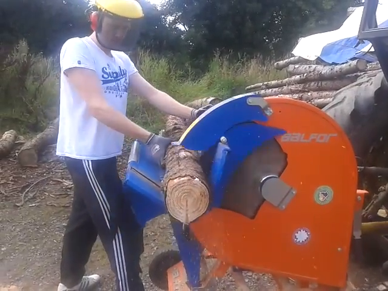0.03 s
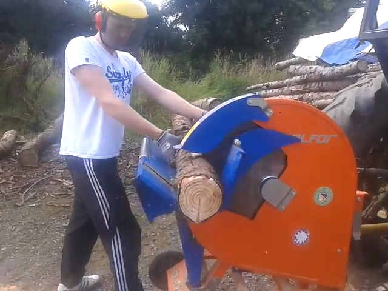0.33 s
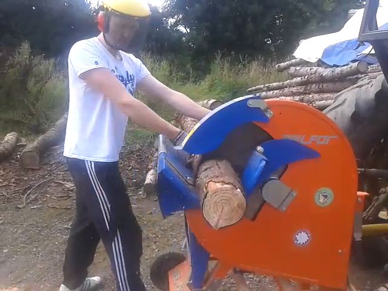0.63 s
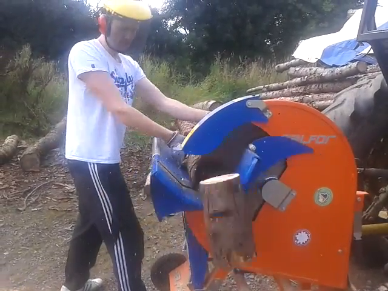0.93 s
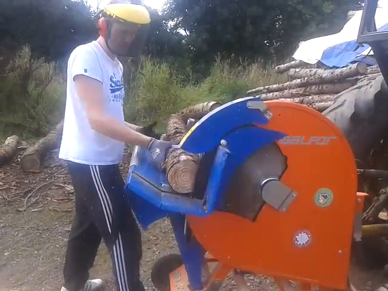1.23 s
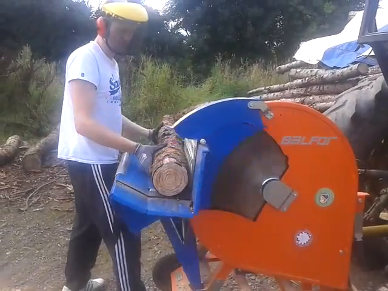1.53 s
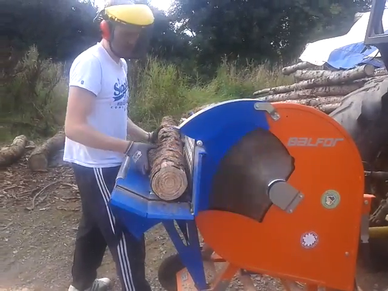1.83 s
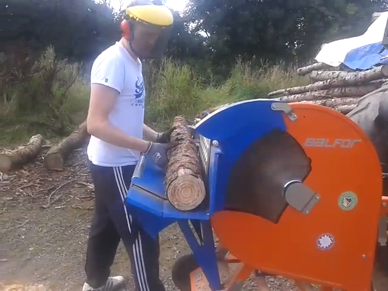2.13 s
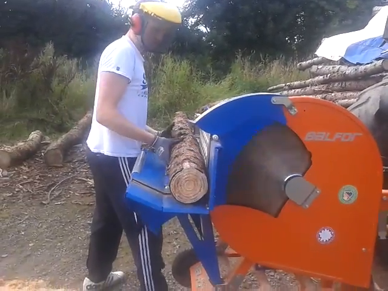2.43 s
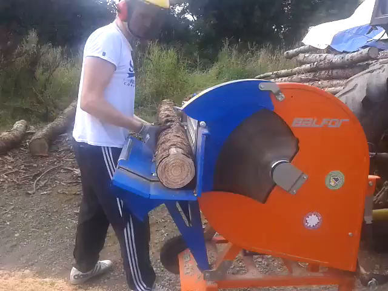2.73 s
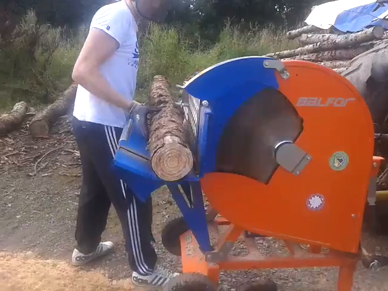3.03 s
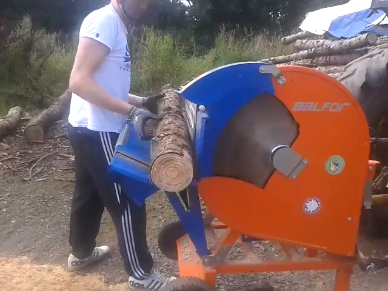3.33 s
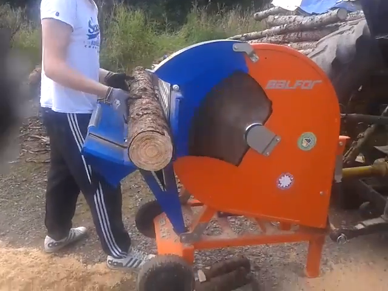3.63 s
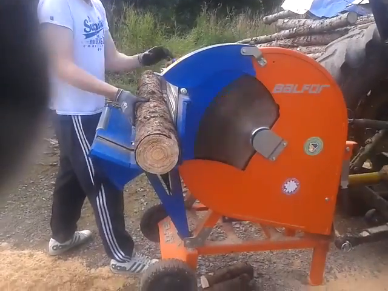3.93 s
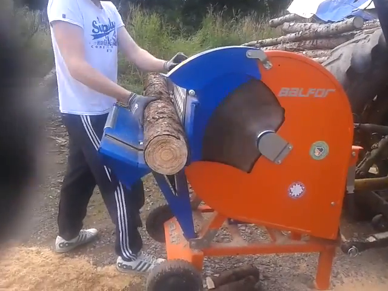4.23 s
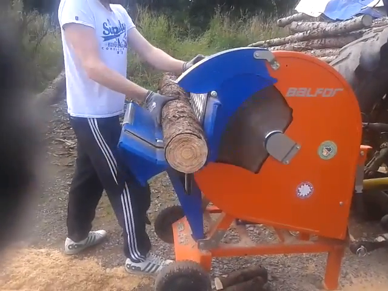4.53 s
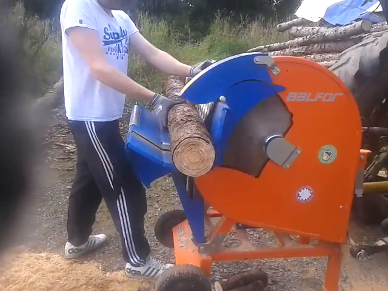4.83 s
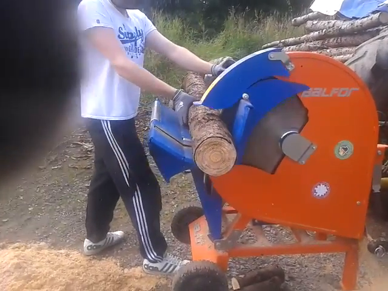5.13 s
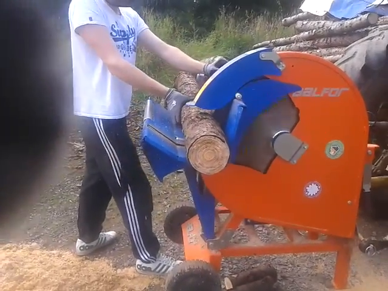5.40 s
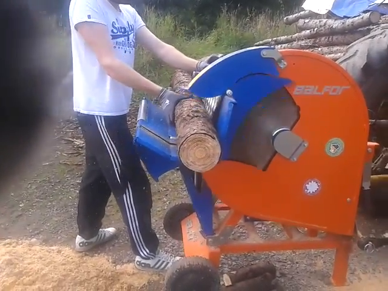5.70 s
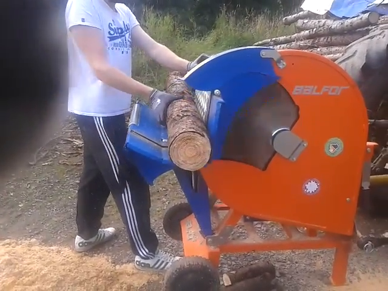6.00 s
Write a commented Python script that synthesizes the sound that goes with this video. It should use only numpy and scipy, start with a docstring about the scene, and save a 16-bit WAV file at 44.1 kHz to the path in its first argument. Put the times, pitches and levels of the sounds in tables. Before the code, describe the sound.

Outdoors and close to the microphone, a large circular saw screams through the end of a log cut, its pitch sagging under load. The blade rings free, a cut piece thuds down, and the log clatters onto a steel cradle. The engine drones and the teeth whistle while the log knocks and scrapes forward. A second rasping, shrieking cut follows with hissing sawdust, leaving the blade ringing.

```python
"""A circular log saw screams through the end of a cut, outdoors and close to the microphone. The billet
drops, the log is shoved along the steel cradle, and a second cut leaves the blade ringing. The teeth
strike and tear the wood, the gripped disc screeches, sawdust hisses and the guard booms. Between cuts the
teeth whistle through the air over the engine's drone; the recorder's gain control pushes that drone down
whenever the teeth bite."""
import sys
import numpy as np
from scipy import signal
from scipy.fft import rfft, irfft, next_fast_len
from scipy.io import wavfile
from scipy.ndimage import uniform_filter1d, minimum_filter1d

SR = 44100
rng = np.random.default_rng(int(sys.argv[2]) if len(sys.argv) > 2 else 0)


def inscribe(sig):
    """Save sig as 16-bit PCM at rate SR to the path in sys.argv[1].

    A 1-D sig is mono; a 2-D sig holds one channel per row.
    Samples are clipped to [-1, 1] before scaling.
    """
    pcm = np.round(np.clip(np.atleast_2d(sig).T, -1, 1) * 32767)
    wavfile.write(sys.argv[1], SR, pcm.astype(np.int16))


N = 271656
T = np.arange(N) / SR

# Blade speed, sagging under load. Each row: time in seconds, tooth rate in Hz.
TOOTH_RATE = [(0, 632.3), (.13, 633.4), (.3, 613.5), (.45, 581.3), (.7, 642.5), (1.2, 663.6), (4.4, 666),
              (4.6, 647), (4.85, 641.4), (4.98, 633), (5.1, 606.5), (5.3, 582.2), (5.5, 630.8),
              (5.8, 672.7), (6.16, 677)]
FREE_HZ, LABOURING_HZ, TEETH_PER_ENGINE_TURN = 667.3, 608, 16.7  # tooth rates at no load and full load
# The engine's tones. Each row: multiple of the shaft rate, level in dB.
ENGINE_LINES = [(1, -40.5), (2, -39.5), (3, -59), (5, -54), (6, -69)]
# The machine's background. Each row: time in seconds, engine gain in dB, machinery gain in dB.
BACKGROUND_GAINS = [(0, 11, 15.5), (.5, 3, 9.5), (.8, 7.5, 2), (1.2, 9.5, 0), (1.35, 5, -0.5),
                    (4.42, 4.5, 1.5), (4.58, -1, -7), (5.0, -10, -22), (5.3, 0, -2), (5.85, 6, 4)]
# The guard swings open as the cradle is pushed in. Each row: time in seconds, opening from 0 to 1.
GUARD_OPENING = [(0, 0.95), (1.15, 1), (1.65, 0), (4.25, 0.05), (4.8, 0.96), (5.6, 0.95), (6.16, 0.28)]

# Spectra of the noises. Each row: frequency in Hz, relative density in dB.
MACHINE_SPECTRUM = [(20, 7), (45, -12), (70, -15), (140, -13.5), (210, -10.5), (330, -5), (430, -9),
                    (580, -5), (760, -2.5), (1150, -1), (2300, 2.5), (3000, -6.5), (4500, -9),
                    (6200, -26.5), (9500, -31.5), (15500, -35.5)]
BARK_SPECTRUM = [(300, -15), (900, -23), (2500, 5), (4300, 4), (6200, -6), (8500, -10.5), (11200, -12.5),
                 (12500, -19), (15500, -20)]
DUST_SPECTRUM = [(2000, -41), (5500, 8), (7000, 17), (9500, 18), (12500, 9), (15500, 3)]
SIZZLE_SPECTRUM = [(6000, -35), (10000, -7), (12000, 4), (13800, -1), (15500, -5)]  # a fine high sizzle
SHIMMER_SPECTRUM = [(500, -29), (900, -5), (1400, -8), (2400, -16), (2900, -3), (4800, -36), (6500, -16),
                    (15500, -64)]  # the crowd of weaker disc modes
RASP_SPECTRUM = [(100, -30), (400, -27), (850, -7), (1300, -1), (2000, -2), (2700, 1.5), (3300, 3.5),
                 (3700, 6.5), (4100, 5), (4700, 3), (5300, 0), (6100, -14), (9000, -25), (15500, -44)]

# Resonating bodies. Each row: frequency in Hz, width in Hz, gain in dB.
GUARD_MODES = [(218.5, 5.8, 12), (562.4, 3.6, 12.5), (573, 80, 15.5)]  # sheet steel
LOG_MODES = [(218, 19, -2.5), (274, 25, -5), (329, 38, -3), (417, 51, -5), (488, 44, 1.5), (638, 31, 2.5),
             (896, 80, -8)]
CRADLE_MODES = [(560, 18, 10), (856, 88, 4), (1030, 150, -12), (1230, 190, 2)]  # the steel bed under the log
FITTING_MODES = [(6670, 280, 1.5), (7700, 310, 7), (8820, 540, 7.5), (9880, 550, 4.5), (10880, 510, 1)]  # loose steel on the cradle
KERF_MODES = [(2210, 30, 10), (2750, 20, 25), (2920, 370, 11.5), (3720, 140, 6), (3930, 68, -15),
              (3640, 210, 18), (4470, 52, 27), (4390, 47, 1), (4320, 70, -2), (4540, 34, 2), (5020, 22, -1)]  # the disc gripped in the cut
# Tones of the steel disc. Each row: frequency in Hz, relative level in dB.
FREE_DISC_MODES = [(888, -8), (1061, -9), (1141, 0.5), (1271, 0.5), (1357, 5), (1400, 1), (1445, -1.5),
                   (1481, 2), (1608, 0), (1776, 3), (1820, 3), (1925, 1.5), (2013, 5.5), (2073, -3),
                   (2132, 4.5), (2218, 4), (2245, 9), (2347, 0), (2401, 8.5), (2490, 1.5), (2555, 5),
                   (2697, 1.5), (3198, -7), (3575, 0.5), (3661, -11), (3741, -9), (3938, -12), (4237, -25),
                   (4990, -6), (5426, -8)]
PRESSED_DISC_MODES = [(1270, -16.5), (1355, -21), (1518, -16), (1776, -18), (1918, -9.5), (2024, -10.5),
                      (2238, -7.5), (2320, -4.5), (2392, -11), (2487, -10.5), (2573, -16), (2826, -8.5),
                      (3063, -6), (3150, -6), (3262, -12), (3343, -16), (3530, 0), (3612, -3), (3644, -4),
                      (3780, -1), (3941, -5), (4080, -8), (4150, -17), (4299, -4), (4377, -3), (4483, -6),
                      (4560, -2), (4694, -2.5), (4775, -5.5), (4920, -6), (5146, -9.5), (5275, -20),
                      (5425, -10), (5520, -26), (5630, -23)]  # these sing as the wood presses on the steel

# How hard the teeth bite in each pass through the wood. Each row: time in seconds, bite in dB.
FIRST_CUT = [(0, 9.5), (.1, 6), (.155, 10), (.3, 2), (.46, -3), (.53, -9.5), (.6, -17.5), (.72, -41)]
GRAZE = [(1.17, -50), (1.24, -34), (1.26, -14), (1.305, -18.5), (1.335, -14.5), (1.41, -33), (1.55, -47)]
SECOND_CUT = [(4.36, -48), (4.38, -24), (4.47, -4.5), (4.6, -8.5), (4.82, -10), (5.06, 1), (5.15, -5),
              (5.35, -12), (5.405, -8), (5.48, 6), (5.58, 18), (5.74, 10), (5.785, 0), (5.87, -5.5),
              (6.0, -20.5), (6.16, -61)]
# The passes. Each row: bite curve, then side rubbing, sawdust and high sizzle in dB, # all at a bite of 0 dB
# and no load.
PASSES = [(FIRST_CUT, -1.4, -14.5, -22.5), (GRAZE, -1.08, -18, -26), (SECOND_CUT, -6.5, -17.5, -22.5)]

# The log slides along the cradle. Each row: peak time and half length in seconds, level in dB.
SLIDES = [(1.196, 0.068, -26), (3.31, 0.22, -30.5), (3.593, 0.072, -33)]
# Billet and log land. Each row: start in seconds, then thud, clack, cradle ring and clatter gains in dB.
KNOCKS = [(0.812, -19, -21, -45, -32), (1.131, -35, -32, -24, -28), (1.151, -30, -26, -30, -21),
          (1.168, -16.5, -28, -27, -23), (1.187, -5.5, -8, -30, -12), (1.211, -25, -19, -35, -12),
          (1.226, -37, -33, -41, -17), (1.24, -23, -29, -34, -13), (1.599, -47, -22, -45, -35),
          (1.901, -34, -24, -25, -43), (2.075, -25, -20, -42, -30), (3.061, -32, -33, -44, -31),
          (3.197, -28, -20, -25, -28), (3.239, -29, -19, -27, -28), (3.268, -30, -37, -17.5, -32),
          (3.288, -18.5, -18.5, -16.5, -23), (3.331, -27, -22, -22, -34), (3.916, -45, -27, -42, -36),
          (4.049, -38, -34, -40, -32)]
# The log judders as the disc drags in the kerf or the cradle swings back.
# Each row: peak time and half length in seconds, chatter in dB, drone in dB.
JUDDERS = [(0.645, 0.098, -29, -22), (1.006, 0.11, -26, -30), (5.244, 0.15, -16, -25)]
# The guard hums. Each row: peak time and half length in seconds, pitch in Hz, level in dB, throb 0 to 1.
GUARD_HUMS = [(0.03, 0.092, 564, -8, 0.66), (0.458, 0.072, 593, -9, 0.3), (0.583, 0.1, 561, -18, 0.6),
              (4.616, 0.21, 565.6, -20, 0.7), (5.303, 0.076, 559.4, -15, 0.35),
              (5.79, 0.054, 566, -10, 0.7)]
# Spurts of sawdust and sizzle. Each row: peak time and half length in seconds, dust gain in dB, sizzle gain in
# dB.
DUST_SPURTS = [(.08, .03, 3, -5), (0.168, 0.051, 4.5, 1), (0.37, 0.041, 3.5, 1), (0.673, 0.067, 9, -2),
               (4.954, 0.13, 3, 5), (5.523, 0.12, -3, 7)]
# Modes left ringing after a cut. Each row: peak time in seconds, pitch in Hz, level in dB, t60 in seconds.
AFTER_RINGS = [(.6, 5500, -25, 0.7), (5.83, 4920, -9.5, 0.65)]
# Squeals. Each row: peak time and half length in seconds, multiple of the tooth rate, dB re the bite.
SQUEALS = [(0.047, 0.12, 2, -13.5), (.13, 0.036, 5, 3), (0.36, 0.17, 5, -4.5), (0.25, 0.15, 6, -7),
           (0.27, 0.13, 7, -6), (4.64, 0.35, 4, -8), (4.93, 0.12, 2, -13.5), (5.17, 0.11, 2, -13),
           (5.8, 0.05, 6, -3)]
# One mode takes over. Each row: peak time and half length in seconds, pitch in Hz, dB re the bite.
SHRIEKS = [(0.01, 0.049, 4500, -7), (0.014, .05, 1920, -10), (0.3, .06, 2330, -19),
           (0.412, 0.1, 2486, -4.5), (0.533, 0.11, 4300, -4), (0.59, 0.13, 3690, -4),
           (4.614, 0.066, 2230, -4), (4.65, 0.14, 3570, -3.5), (5.068, 0.038, 4700, -1),
           (5.465, 0.13, 4795, -5), (5.533, 0.27, 1199, -22), (5.45, 0.081, 3310, -9),
           (5.47, 0.16, 2404, -11), (5.56, 0.14, 3941, -14), (5.54, 0.28, 4360, -12),
           (5.554, 0.15, 4479, -7), (5.708, 0.079, 3645, -16)]


def undb(db):
    """Decibels to gain."""
    return 10 ** (np.asarray(db) / 20)


def level(x, db=0):
    """Scale to an rms level."""
    return x * undb(db) / np.sqrt(np.mean(x ** 2))


def curves(table):
    """One curve per column of a table of timed rows."""
    times, *columns = np.transpose(table)
    return [np.interp(T, times, column) for column in columns]


def swell(peak_s, half_s):
    """A smooth rise and fall, down to 1/e at half_s either side of the peak."""
    return np.exp(-((T - peak_s) / half_s) ** 2)


def noise():
    """White noise."""
    return rng.standard_normal(N)


def walk(rate):
    """A random curve with a spread near 1, changing rate times a second."""
    return 1.3 * np.interp(T * rate, np.arange(4096), rng.standard_normal(4096))


def turns(hz):
    """Phase in cycles of a changing rate."""
    return np.cumsum(hz) / SR


def tone(hz, wander, rate):
    """A partial whose phase wanders by a share of a cycle, rate times a second."""
    return np.sin(2 * np.pi * (turns(hz * np.ones(N)) + rng.random() + wander * walk(rate)))


def butter(x, order, hz, kind):
    """Butterworth filter."""
    return signal.sosfilt(signal.butter(order, hz, kind, fs=SR, output="sos"), x)


def high_pass(x, hz):
    """Small bodies radiate little bass."""
    return butter(x, 4, hz, "high")


def colour(x, spectrum):
    """Give a sound a smooth spectrum of (Hz, dB) points."""
    hz, db = np.transpose(spectrum)
    size = next_fast_len(N + 4096)
    bins = np.maximum(np.fft.rfftfreq(size, 1 / SR), 1)
    gain = undb(np.interp(np.log(bins), np.log(hz), db))
    return irfft(rfft(x, size) * level(gain), size)[:N]


def resonate(x, modes):
    """Ring a body of (Hz, width in Hz, dB) modes."""
    return sum(undb(db) * signal.lfilter(*signal.iirpeak(hz, hz / width, SR), x)
               for hz, width, db in modes)


def plate(x, low_hz, high_hz, spacing_hz, width_hz, spread_db=2):
    """The steel disc passes sound through a crowd of narrow, unevenly spaced modes."""
    centres = np.arange(low_hz, high_hz, spacing_hz)
    scatter = rng.standard_normal((len(centres), 2))
    modes = [(hz + spacing_hz * shift / 4, width_hz, spread_db * size)
             for hz, (shift, size) in zip(centres, scatter)]
    return level(resonate(x, modes))


def ring_down(drive, t60):
    """Amplitude of a vibration that stores the energy fed to it and loses 60 dB in t60 seconds."""
    keep = np.exp(-2 * np.log(1000) / (SR * t60))
    return np.sqrt(signal.lfilter([1 - keep], [1, -keep], drive ** 2))


def engine(tooth_hz, gain_db):
    """The drone of the drive behind everything, which slows with the blade."""
    shaft = 2 * np.pi * turns(tooth_hz / TEETH_PER_ENGINE_TURN)
    lines = sum(level(np.sin(multiple * shaft + rng.uniform(0, 2 * np.pi)), db)
                for multiple, db in ENGINE_LINES)
    return lines * undb(gain_db + .5 * walk(9))


def machinery(tooth_hz, gain_db, throb=0.087):
    """Gears, belts and churned air, pulsing with the firings and booming in the guard."""
    firing = 2 * turns(tooth_hz / TEETH_PER_ENGINE_TURN)
    rush = noise() * (1 + throb * np.cos(2 * np.pi * firing)) * undb(0.76 * walk(14))
    boom = level(resonate(noise(), GUARD_MODES), -27)
    return (level(colour(rush, MACHINE_SPECTRUM), -20.5) + boom) * undb(gain_db)


def air_hiss(opening, open_db=-37.75, shut_loss_db=13.5, flicker_db=2.2):
    """The bare teeth hiss through dusty air, more faintly as the guard closes over them."""
    hiss = level(colour(noise(), DUST_SPECTRUM), open_db)
    return hiss * undb(-shut_loss_db * (1 - opening) - flicker_db * walk(16))


def whistle(opening, bite, shut_hz=1805, open_drop_hz=130, half_width_hz=195):
    """Vortices shed by the teeth: a rough whistle, lower with the guard open and choked by the wood."""
    eddies = butter(noise() + 1j * noise(), 2, half_width_hz, "low")
    band = np.real(eddies * np.exp(2j * np.pi * turns(shut_hz - open_drop_hz * opening)))
    return level(band, -15) * undb(-0.5 * opening) / (1 + bite)


def bark_rattle(per_second=30, spread_db=4, tick_s=0.027):
    """Loose bark and chips rattle softly on the shaking cradle."""
    hits = (rng.random(N) < per_second / SR) * undb(spread_db * np.minimum(rng.exponential(size=N), 2))
    decays = signal.lfilter([1], [1, -np.exp(-1 / (tick_s * SR))], hits)
    ticks = uniform_filter1d(decays, size=300)
    return level(colour(noise() * ticks, BARK_SPECTRUM), -37)


def scraping(rough_db=6):
    """Bark drags over the steel bed in small jerks."""
    pressure = sum(undb(db) * swell(s, half_s) for s, half_s, db in SLIDES)
    jerks = noise() * undb(rough_db * walk(90))
    return level(colour(jerks, BARK_SPECTRUM)) * pressure


def knocks(contact_s=.009, crush_s=.003, clack_s=0.023, clatter_s=0.0082):
    """Wood lands on ground and cradle: the log thuds, the bed rings, bark clacks, fittings clatter."""
    thud, ring, clack, clatter = np.zeros((4, N))
    for s, thud_db, clack_db, ring_db, clatter_db in KNOCKS:
        age = np.maximum(T - s, 0)
        blow = (T >= s) * np.exp(-age / contact_s)
        crush = 1 - np.exp(-age / crush_s)  # the bark gives way first, which softens the attack
        thud += undb(thud_db) * blow
        ring += undb(ring_db) * blow
        clack += crush * undb(clack_db) * np.exp(-age / clack_s)
        clatter += crush * undb(clatter_db) * np.exp(-age / clatter_s)
    grit = noise()

    def struck(force, modes):
        """A body rung by a gritty blow."""
        return resonate(grit * force, modes) / np.std(resonate(grit, modes))

    log_and_bed = 2 * high_pass(struck(thud, LOG_MODES) + struck(ring, CRADLE_MODES), 234)
    fittings = butter(struck(clatter, FITTING_MODES), 6, [5000, 11500], "band")
    return log_and_bed + colour(noise() * clack, BARK_SPECTRUM) + fittings


def guard_boom(bite):
    """The uneven pull of the teeth booms in the guard."""
    boom = resonate(resonate(noise(), GUARD_MODES), GUARD_MODES)
    return high_pass(level(boom, -19.5) * bite ** 0.98, 145)


def log_chatter(bite, drone_hz=207, waver=0.0118):
    """The teeth make the log chatter in the cradle; in a judder it drones too."""
    shaking, dragging = bite * undb(-25), 0
    for s, half_s, chatter_db, drone_db in JUDDERS:
        shaking += undb(chatter_db) * swell(s, half_s)
        dragging += undb(drone_db) * swell(s, half_s)
    chatter = level(resonate(noise(), LOG_MODES)) * shaking
    phase = turns(drone_hz * (1 + waver * walk(35)))
    drone = level(np.sin(2 * np.pi * phase) * undb(2 * walk(24.5))) * dragging
    return high_pass(chatter, 145) + drone


def guard_hums(wander=0.039, flutter_db=2.5, beat_hz=16):
    """The guard's main resonance swells now and then, and throbs against a close neighbour."""
    out = 0
    for s, half_s, hz, db, throb in GUARD_HUMS:
        pair = tone(hz, wander, rate=50) + throb * tone(hz + beat_hz, wander, rate=50)
        out += level(pair * undb(flutter_db * walk(45)), db) * swell(s, half_s)
    return out


def dust_and_sizzle(dust, spray, grain_db=2, gust_db=1.54, entry_s=4.363, rise_s=.02, fade_s=.2):
    """Chips ring the disc's highest modes in gusts, with a burst as the teeth break the bark, over a fine high
    sizzle."""
    chips = noise() * undb(grain_db * rng.exponential(size=N) + gust_db * walk(22.02))
    ringing = plate(chips, 5600, 15600, spacing_hz=260, width_hz=60)
    for s, half_s, coarse_db, fine_db in DUST_SPURTS:
        dust = dust * undb(coarse_db * swell(s, half_s))
        spray = spray * undb(fine_db * swell(s, half_s))
    age = T - entry_s
    burst = undb(-25) * np.clip(age / rise_s, 0, 1) * np.exp(-np.abs(age) / fade_s)
    coarse = level(high_pass(colour(ringing, DUST_SPECTRUM), 2000))
    fine = level(colour(level(chips) + ringing, SIZZLE_SPECTRUM))
    return coarse * (dust + burst) + fine * spray


def disc_ring(rub, t60_at_1khz=2.77, beating=.33, flutter=.16):
    """Rubbing feeds the spinning disc's modes; the low ones ring longest, and each beats and flutters."""
    out = level(colour(noise(), SHIMMER_SPECTRUM), -10) * ring_down(rub, t60=0.88)
    for hz, db in FREE_DISC_MODES:
        t60 = t60_at_1khz * (1000 / hz) ** 0.77
        sway = 1 + beating * (walk(25) + 1j * walk(25)) + flutter * walk(110)
        mode = np.real(sway * np.exp(2j * np.pi * (hz * T + rng.random())))
        out += undb(db - 11) * ring_down(rub, t60) * mode
    return out


def after_rings(rise_s=0.045):
    """One high mode of the disc rings on and dies away as the teeth leave the wood."""
    out = 0
    for s, hz, db, t60 in AFTER_RINGS:
        decay = np.exp(-np.log(1000) * np.abs(T - s) / t60)
        envelope = np.where(T < s, swell(s, rise_s), decay)
        out += level(tone(hz, wander=.04, rate=37), db) * envelope
    return out


def screech(force, swell_db=3):
    """The grip of the kerf keeps changing, so each mode of the disc swells and fades on its own."""
    modes = sum(resonate(force, [mode]) * undb(swell_db * walk(9)) for mode in KERF_MODES)
    return level(high_pass(modes, 830), -9)


def squeals(tooth_phase, wander=.01, flutter_db=3):
    """An overtone of the tooth rate locks to the disc: a short rough whine that glides with the speed."""
    out = 0
    for s, half_s, multiple, db in SQUEALS:
        whine = np.sin(2 * np.pi * multiple * (tooth_phase + wander * walk(200)))
        out += level(whine * undb(flutter_db * walk(90)), db) * swell(s, half_s)
    return out


def scream(drift=.004, wander=.155, swell_db=4, flutter_db=2):
    """Many of the disc's own tones drift and swell with the grip; now and then one shrieks."""
    held = sum(tone(hz * (1 + drift * walk(4)), wander, rate=70) * undb(db + swell_db * walk(8.6))
               for hz, db in PRESSED_DISC_MODES)
    out = level(held, -3)
    for s, half_s, hz, db in SHRIEKS:
        shriek = tone(hz, wander, rate=70) * undb(flutter_db * walk(60))
        out += level(shriek, db) * swell(s, half_s)
    return out


def contact_with_wood(load, grip_db=-23, dust_load_db=5, spray_growth=1.32):
    """Gains of bite, side rubbing, dust and high sizzle; load damps the rubbing and throws more dust."""
    bite, rub, dust, spray = undb(-90), 0, 0, 0
    for curve, rub_db, dust_db, spray_db in PASSES:
        touching = (T >= curve[0][0] - .03) * (T <= curve[-1][0] + .03)
        gain = undb(curves(curve)[0]) * touching
        bite += gain
        rub += gain * undb(rub_db)
        dust += gain * undb(dust_db)
        spray += gain ** spray_growth * undb(spray_db)  # a harder bite brings more of the high sizzle
    return bite, rub * undb(grip_db * load), dust * undb(dust_load_db * load), spray


def cutting(tooth_hz, bite, scatter_db=2, slip=0.083, strike_share=0.024, tear_share=0.1):
    """Each tooth strikes the wood and tears fibres, and the gripped disc screeches."""
    tooth_phase = turns(tooth_hz * (1 + .005 * walk(150)))
    # fibres give way a little early or late, which smears the upper overtones
    contact = tooth_phase + slip * walk(600)
    strength = undb(scatter_db * rng.standard_normal(8192))[contact.astype(int) % 8192]
    along_gap = contact % 1  # slip and the shares are fractions of this gap between teeth
    strikes = strength * np.exp(-((along_gap - .5) / strike_share) ** 2)
    tearing = strength * noise() * np.exp(-((along_gap + .5) % 1) / tear_share)
    force = high_pass(level(tearing) + level(strikes, -12), 370)
    ringing = plate(force, 900, 6400, spacing_hz=85, width_hz=16)
    rasp = level(colour(ringing + .45 * level(force), RASP_SPECTRUM), -1)
    return (rasp + screech(force) + squeals(tooth_phase) + scream()) * bite


def scene():
    """The whole saw from one microphone close by in the open air; the sag in speed tells the load."""
    tooth_hz, = curves(TOOTH_RATE)
    opening, = curves(GUARD_OPENING)
    engine_db, machinery_db = curves(BACKGROUND_GAINS)
    load = np.clip((FREE_HZ - tooth_hz) / (FREE_HZ - LABOURING_HZ), 0, 1)
    bite, rub, dust, spray = contact_with_wood(load)
    drive = engine(tooth_hz, engine_db) + machinery(tooth_hz, machinery_db)
    air = whistle(opening, bite) + air_hiss(opening)
    sawing = cutting(tooth_hz, bite) + dust_and_sizzle(dust, spray)
    shaking = guard_boom(bite) + log_chatter(bite) + guard_hums()
    ringing = disc_ring(rub) + after_rings()
    wood = knocks() + scraping() + bark_rattle()
    return (drive + air + sawing + shaking + ringing + wood)[None]


def gain_control(x, follow_s=0.055, target_db=-11, ratio=4):
    """The recorder rides its gain against the running power of the sound."""
    keep = np.exp(-1 / (follow_s * SR))
    power, _ = signal.lfilter([1 - keep], [1, -keep], x ** 2, zi=[np.mean(x[:1024] ** 2)])
    return x * (undb(target_db) / np.sqrt(power)) ** (1 - 1 / ratio)


def limiter(x, ceiling=.76, hold_samples=41):
    """Duck for about a millisecond around every peak over the ceiling."""
    gain = ceiling / np.maximum(np.abs(x), ceiling)
    return x * uniform_filter1d(minimum_filter1d(gain, hold_samples), hold_samples)


def record(dry, overload_db=23, bass_hz=160, top_hz=15800):
    """The microphone overloads in the hardest bite; then bass cut, top cut, gain control and limiter."""
    x = undb(overload_db) * np.tanh(dry[0] / undb(overload_db))
    x = butter(x, 2, bass_hz, "high")
    top_cut = signal.firwin(401, top_hz, fs=SR)
    x = signal.fftconvolve(x, top_cut, "same")
    x = limiter(gain_control(x))
    return signal.fftconvolve(x, top_cut, "same")[None]


dry = scene()
out = record(dry)
inscribe(out)
```